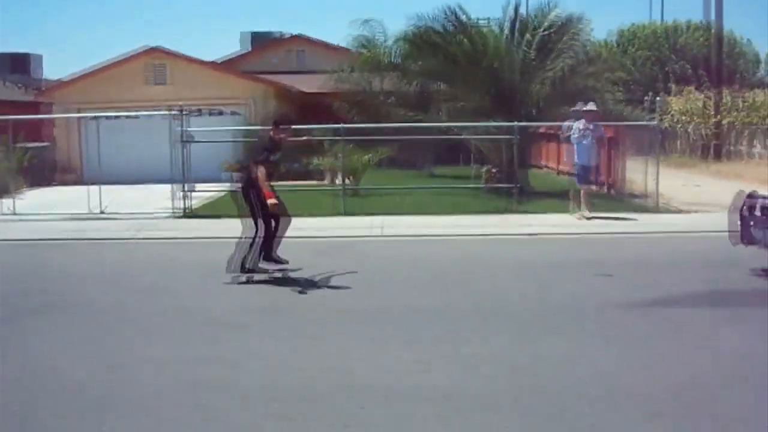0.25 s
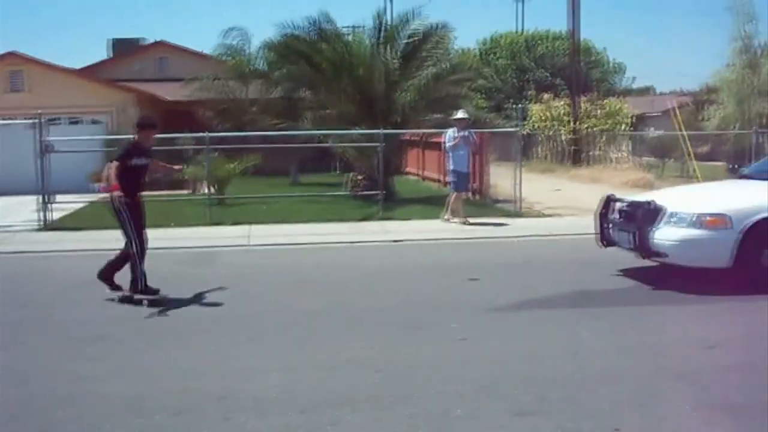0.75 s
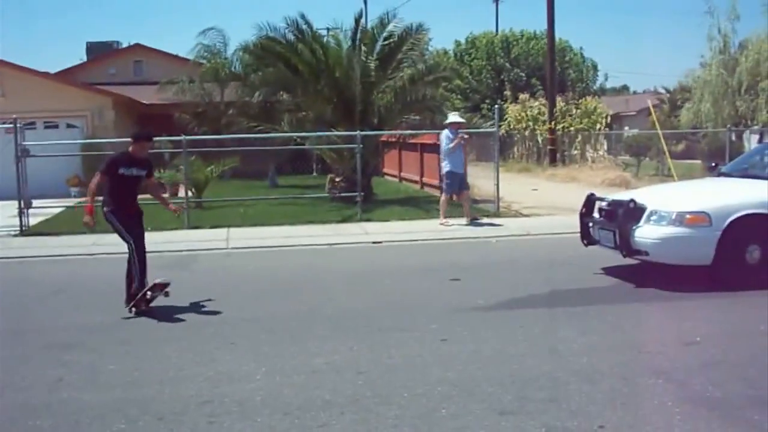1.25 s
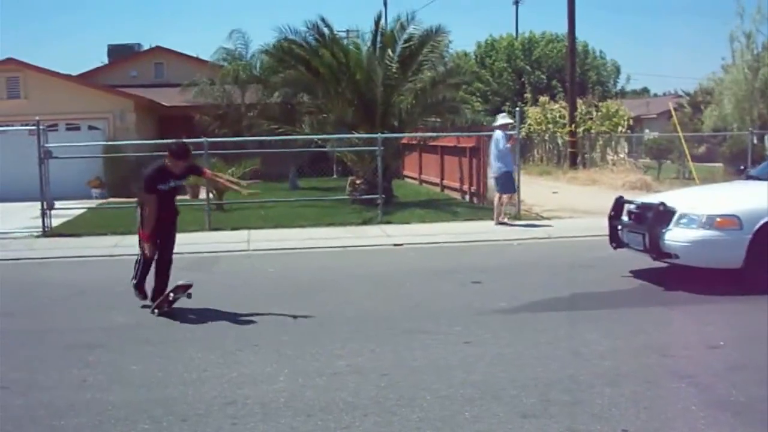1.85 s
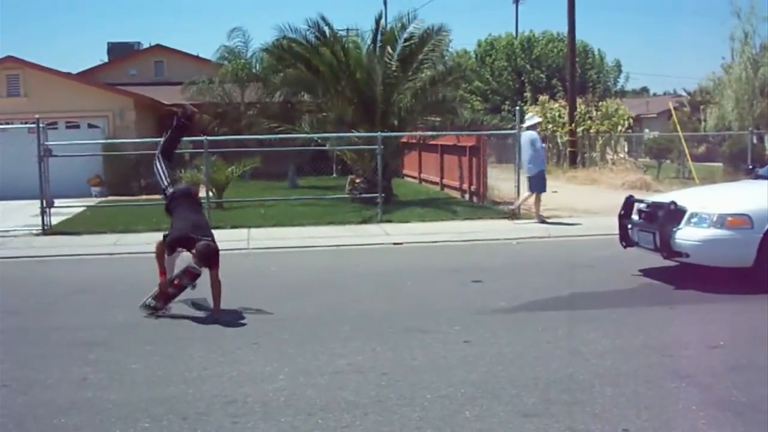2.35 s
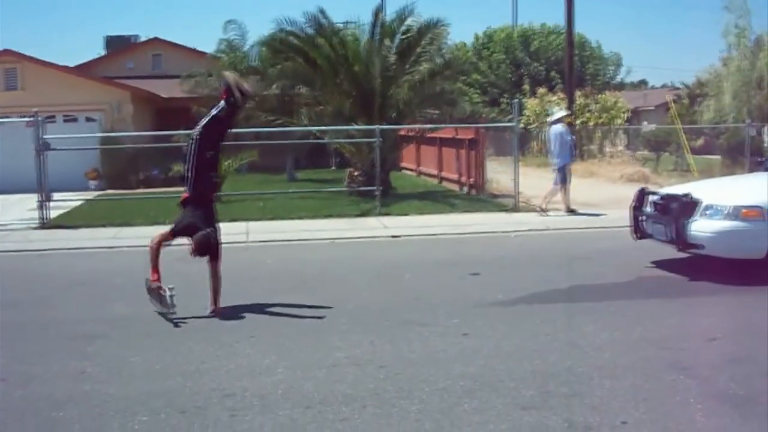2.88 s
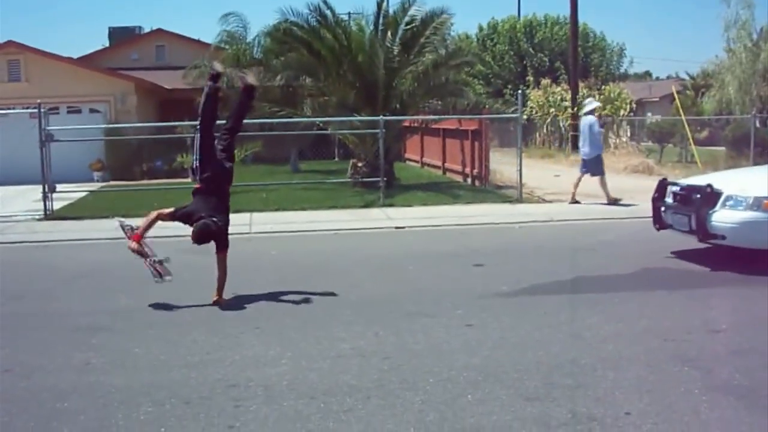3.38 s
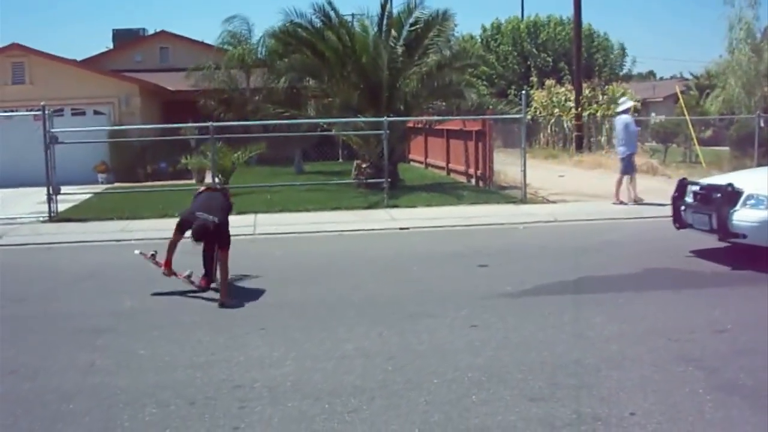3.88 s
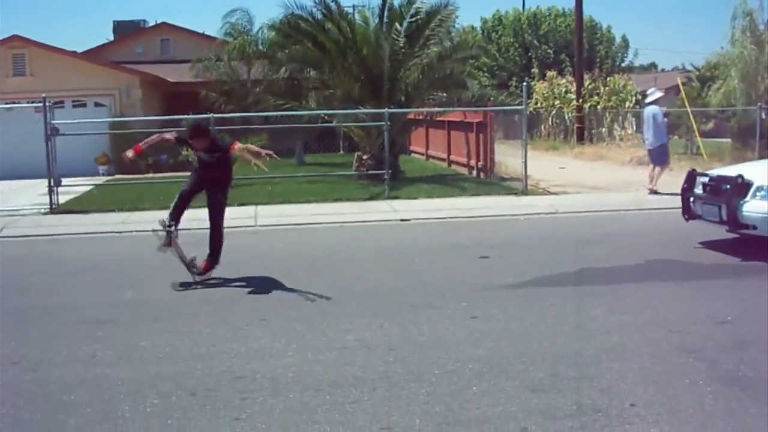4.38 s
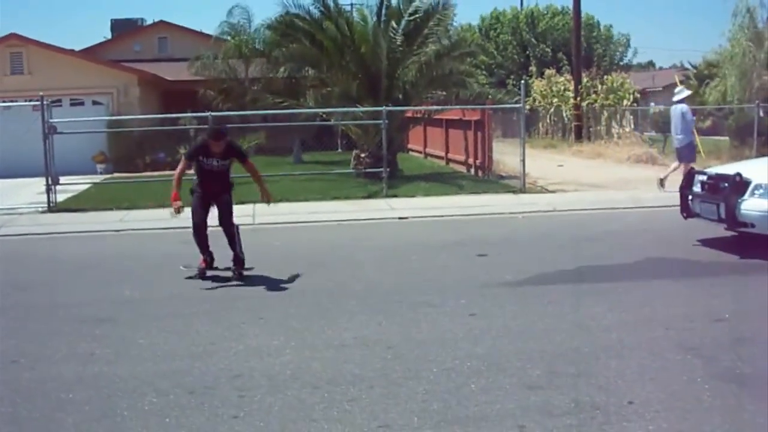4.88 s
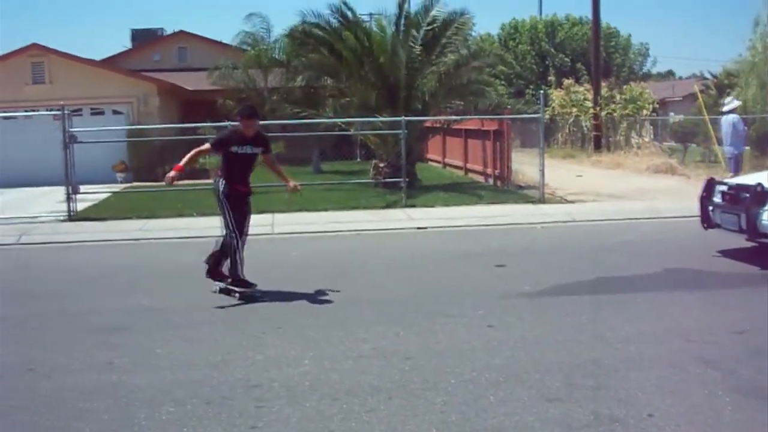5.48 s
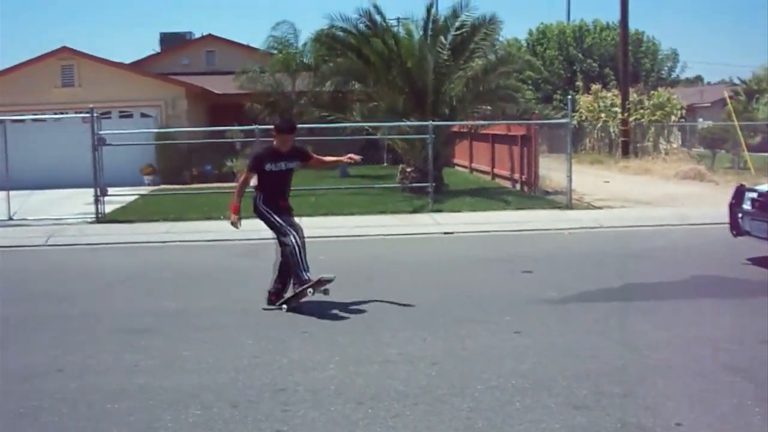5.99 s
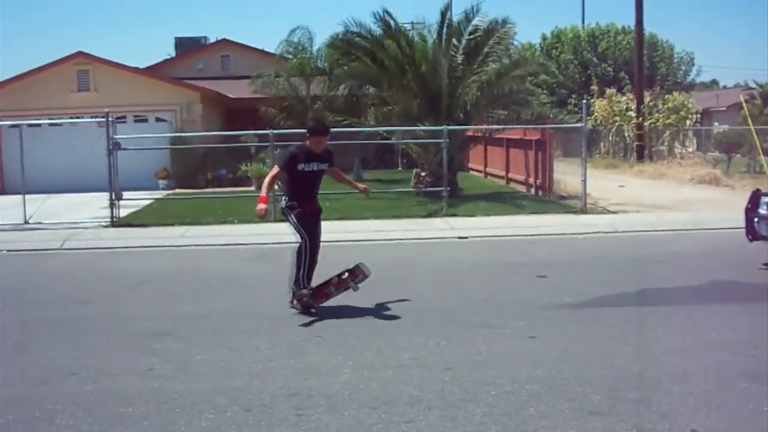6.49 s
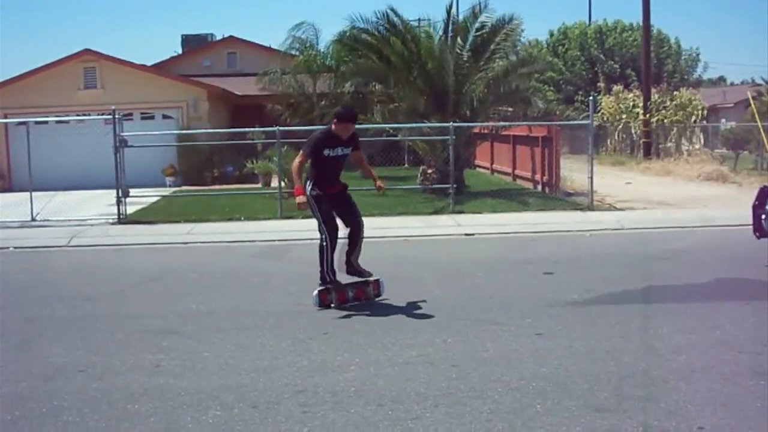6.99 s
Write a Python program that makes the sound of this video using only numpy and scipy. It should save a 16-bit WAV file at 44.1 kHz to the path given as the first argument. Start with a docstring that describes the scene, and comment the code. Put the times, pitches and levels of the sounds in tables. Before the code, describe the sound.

Hard skateboard clacks, light knocks and short gritty drags on a residential street, over rumbling wind buffets and a faint distant town hush.

```python
"""A skateboard's wooden deck on street asphalt, a few metres off: resonances driven by spiky noise.
A faint clack and a scrape, two hard clacks at 0.38 s, sparser knocks and drags, a cluster near 2.7 s,
the hardest burst at 4.9 s, then mostly light clacks and drags until a hollow knock near 6.9 s.
House fronts answer with a short random-phase wash. Throughout, low coloured noise and short thumps
make wind buffet the microphone, over a far town hush of noise with a faint wavering drone."""
import sys
import numpy as np
from scipy import signal
from scipy.fft import rfft, irfft, next_fast_len
from scipy.io import wavfile
from scipy.ndimage import uniform_filter1d, map_coordinates

SR = 44100
rng = np.random.default_rng(int(sys.argv[2]) if len(sys.argv) > 2 else 0)


def log_audio(samples):
    """Write samples as a 16-bit WAV file to the path given in sys.argv[1]."""
    # one column per channel
    frames = np.atleast_2d(samples).T
    # limit to full scale, then quantise
    limited = np.clip(frames, -1, 1)
    pcm = np.round(limited * 32767).astype(np.int16)
    wavfile.write(sys.argv[1], SR, pcm)


N = 319504
T = np.arange(N) / SR


def amp(db):
    """dB to amplitude."""
    return 10 ** (np.asarray(db) / 20)


def unit(x):
    """x scaled to rms 1."""
    return x / np.sqrt(np.mean(x ** 2) + 1e-20)


def along(points, hz):
    """(f/Hz, value) points read on a log frequency axis."""
    f, v = np.transpose(points)
    return np.interp(np.log(hz + 1), np.log(f + 1), v)


def curve(points):
    """(t/s, value) points, one value per sample."""
    s, v = np.transpose(points)
    return np.interp(T, s, v)


def wobble(knots_per_s):
    """Smooth random curve."""
    knots = rng.standard_normal(int(N * knots_per_s / SR) + 4)
    return map_coordinates(knots, [T * knots_per_s])


def filtered(x, response):
    """x times a complex response of frequency."""
    m = next_fast_len(N + SR // 2)
    return irfft(rfft(x, m) * response(np.fft.rfftfreq(m, 1 / SR)), m)[..., :N]


def noise(spectrum):
    """Coloured noise of rms 1."""
    return unit(filtered(rng.standard_normal(N), lambda hz: amp(along(spectrum, hz))))


def resonant(x, modes):
    """x through causal band-pass resonances of alternating sign."""
    def response(f):
        total = 0
        for k, (hz, width_hz, db) in enumerate(modes):
            damping = 1j * f * width_hz
            total = total + (-1) ** k * amp(db) * damping / (hz * hz - f * f + damping)
        return total
    return filtered(x, response)


# deck modes: f/Hz, width/Hz, relative level/dB
DECK_MODES = [(1065, 250, 10.5), (1276, 320, 7.5), (1833, 278, 5.5), (2490, 295, 2.5), (2850, 970, 3.5),
              (3430, 350, 4.5)]


def deck(drives):
    """Bending modes of the wood: row k drives mode k."""
    return sum((-1) ** k * resonant(row, [mode]) for k, (row, mode) in enumerate(zip(drives, DECK_MODES)))


def favour(mode, fall_db):
    """The touched spot decides which mode speaks most; its neighbours fall away."""
    return amp(-fall_db * np.abs(np.arange(len(DECK_MODES)) - mode))[:, None]


# axles and hangers: f/Hz, width/Hz, relative level/dB
TRUCK_MODES = [(3996, 380, 0), (4490, 690, -1.5), (4940, 600, -2.5)]
# hard rim: f/Hz, width/Hz, relative level/dB
RIM_MODES = [(7090, 980, 2.5), (7600, 1040, 2), (8430, 820, -0.5)]
# contacts: t/s, blow level/dB, rattle t60/s, [knock, trucks, rim] level/dB over the blow,
# favoured deck mode (0-5; beyond 5 leans to the top), send to the houses level/dB over direct
CONTACTS = [(0.156, -32, 0.013, -12, 4, -13, 1, 12), (0.3756, -4.5, 0.0053, -20, -16, -4.5, 0.39, -1),
            (.377, -5.5, 0.013, -10.5, -20, -18, 2.78, -0.5), (0.3842, -18, 0.025, -15, -7, -24, 2.7, 9),
            (0.4178, -20, 0.034, -21, -15, -17, 2, 5), (0.4246, -28.5, .015, -2, -16, -17, 3.6, 10),
            (.496, -29.5, 0.039, -8, -18, -28, 2.4, 0), (0.5763, -34.5, 0.027, -3, -12, -5.5, 2.5, 16),
            (.936, -17, 0.021, -9, -10, -11.5, 2.8, 9), (1.2024, -22, 0.01, -20, -10, -10, 1.4, 5),
            (1.2845, -21, 0.033, -8.5, -5.5, -23, 1.4, 6), (1.5648, -37, 0.017, 2, -5, -6, 0.87, 17.5),
            (2.6494, -26, 0.046, 3, -9, -23, 0.1, -0.5), (2.652, -16, 0.017, -31, -7.5, -10.5, 2.4, 3),
            (2.6571, -13.5, 0.009, -22, -25, -30, 2.3, -4), (2.8254, -8, 0.011, -5, -10, -24, 0.98, 5),
            (2.827, -10.5, 0.019, -17, 3, -13.5, 2.3, -7), (2.835, -18.5, 0.024, -12.5, -8, -11.5, 3, 16),
            (3.4867, -25, 0.0098, -4, -9, -11.5, 1.5, 13), (4.0784, -23.5, 0.031, -2.5, -3, -3, 0.82, 10),
            (4.082, -18.5, 0.017, 0.5, -6, -26, 3.1, -4), (4.9088, -2.5, 0.032, -20.5, -9.5, -15.5, 7, -10),
            (4.911, 1.5, 0.0059, -22.5, -16, -15, 2.44, -3), (4.9124, -12, 0.033, -3.5, -12, -17, 6.1, 5.5),
            (4.9184, -19.5, 0.028, -10.5, -8, -10, 2.5, -4), (4.929, -28, 0.043, -1.5, 5, -5.5, 2.6, -6),
            (4.9341, -19, .012, -13, -9, -12, 2, -5), (4.9506, -18, 0.032, -4, -7, -14, 2.2, -6),
            (4.9556, -10.5, 0.0079, -12, -10, -21, 2.23, 8), (4.9581, -13, 0.009, -4.5, -9, -34, 1, -3),
            (5.077, -33, 0.068, -13, -24, -37, .4, 13), (5.732, -25.5, 0.037, -7.5, -2, 1.5, 2.6, -11),
            (5.7855, -17, 0.015, -17, -6, -11, 2.5, 3.5), (5.7947, -33, 0.0091, -3, -8, 2, 4, -2),
            (5.919, -35, 0.043, -13, -10, -16, 1, 12), (5.9679, -29.5, 0.015, -17, -1, -6, 2, 12),
            (6.0202, -32.5, 0.037, -6.5, -6, -7, 1.6, 11), (6.099, -21.5, 0.0053, -8, -26, -24, 2.8, 0),
            (6.2146, -21, 0.026, -8, -22, -25, 0.67, -25), (6.221, -26.5, 0.016, -10, -9, -4, 2.6, -1),
            (6.379, -32, 0.018, -23, -22, -14, 0.9, 2), (6.613, -33, 0.022, -14, -19, -11, 1.5, 14),
            (6.649, -33, 0.041, -9, -8, -5.5, 1.7, 6), (6.873, -32, 0.025, 5, -7, -9, 1.3, 16),
            (6.8972, -15, 0.016, 12.5, 2, -22.5, 3.3, -11.5),
            (6.9083, -20.5, 0.024, -6, -23, -13.5, 0.43, -3), (7.023, -35, 0.016, 1, -21, -34, 1, -3)]
WOOD_DB, KNOCK_DB = 12, 5.5  # how readily the deck turns a blow into crack and into knock
KNOCK_HZ, KNOCK_HZ_PER_DB = 655, -6.5  # the freer the deck, the louder and lower its knock
SNAP_S, SNAP_DB, SNAP_DB_PER_S = 0.0001, 12, -480  # delay, level over the rattle, slope with its t60
THUD_S, THUD_DB = 0.00092, -5
RATTLE_RISE_S = 0.00097


def clacks():
    """Snap and rattle drive deck, trucks and rim; knock and thud add. Returns (direct, to houses) pairs."""
    t = np.arange(SR // 12) / SR
    shape = (len(DECK_MODES) + 2, len(t))
    drive = np.zeros((shape[0], 2, N + SR))
    hollow = np.zeros((2, N + SR))

    f = np.fft.rfftfreq(len(t), 1 / SR)
    parts = [[mode] for mode in DECK_MODES] + [TRUCK_MODES, RIM_MODES]
    heard = np.sqrt([sum(w / np.hypot(2 * (f - hz), w) ** 2 for hz, w, _ in part) for part in parts])
    heard /= np.linalg.norm(heard, axis=1)[:, None]  # band in which each part answers

    for s, db, t60, knock_db, trucks_db, rim_db, mode, away_db in CONTACTS:
        start = round(s * SR)
        span = slice(start, start + len(t))
        paths = amp([[0], [away_db]])

        spikes = rng.standard_normal(shape) * amp(4.4 * np.minimum(rng.exponential(size=len(t)), 4.5))
        fade = amp(db + WOOD_DB - 60 * t / t60) * (1 - np.exp(-t / RATTLE_RISE_S))
        strength = np.linalg.norm(fade)
        rattle = spikes * fade
        # each part's energy is set, its grain is chance
        grit = rattle * strength / np.linalg.norm(rfft(rattle) * heard, axis=1)[:, None]
        grit[:, round(SNAP_S * SR)] += amp(SNAP_DB + SNAP_DB_PER_S * t60) * strength  # first hard touch
        shares = np.vstack([favour(mode, fall_db=7), amp([[trucks_db], [rim_db]])])
        drive[..., span] += (grit * shares)[:, None] * paths

        # the deck stays pressed to the ground: the knock swells and is choked at once
        u = t / (0.11 * t60)
        swell = (u * np.exp(1 - u)) ** 2
        hz = KNOCK_HZ + KNOCK_HZ_PER_DB * knock_db
        hollow[:, span] += paths * amp(db + knock_db + KNOCK_DB) * swell * np.sin(2 * np.pi * hz * t)

        # thud: the whole board pushed against the ground, equal on both paths
        v = t / THUD_S
        hollow[:, span] += amp(db + THUD_DB) * v * (2 - v) * np.exp(-v)

    *wood, trucks, rim = drive[..., :N]
    crack = deck(wood) + resonant(trucks, TRUCK_MODES) + resonant(rim, RIM_MODES)
    return crack, hollow[:, :N]


def grains():
    """Stones of the asphalt ticking past in clumps."""
    clumps_db = 4 * wobble(200) + 1.2 * wobble(60)
    spikes_db = 3.73 * np.minimum(rng.exponential(size=N), 6.5)
    return rng.standard_normal(N) * amp(spikes_db + clumps_db)


# deck bending as a whole when dragged: f/Hz, width/Hz, relative level/dB
BELLY_MODES = [(735, 206, -6.5), (314.5, 35, 1)]
# wood and wheels dragging: t/s of the top, rise/s, fall/s (20 dB each), top level/dB,
# [trucks, rim, belly] level/dB over the wood, favoured deck mode (0-5)
STROKES = [(0.106, 0.002, 0.098, -43.5, -2, -9, 10.5, 1.2), (0.212, 0.22, 0.15, -29, -16, -27, -3.5, 2.3),
           (.47, 0.051, 0.072, -35, -27, -35, -2.5, 1.5), (0.956, 0.02, 0.015, -21.5, -12, -20, -2, 1.1),
           (1.071, 0.056, 0.16, -40.5, -4, -8, 6, 1.5), (1.22, 0.062, 0.061, -26.5, -12, -20, 0, 1.9),
           (2.42, 0.04, 0.1, -40.5, -30, -14, 0, 1.1), (2.547, 0.0086, 0.014, -29.5, -30, -18, -39, 3.05),
           (3.492, 0.0028, 0.025, -27, -9, -12, -5.5, 2.3), (4.089, 0.004, 0.053, -33.5, -5, -7, -0.5, 2),
           (4.44, 0.025, 0.2, -48.5, -7.5, -4, -7, 1.2), (4.661, 0.04, 0.036, -37, -6.5, -17, -11, 2.3),
           (5.06, 0.091, 0.17, -40.5, -18, -36, -17, 1.7), (5.42, 0.13, 0.57, -49, -8, -9, -13, 1.6),
           (5.64, 0.035, 0.042, -45, -9, -23, -24, 1.8), (5.751, 0.024, 0.033, -27.5, -10, -12.5, 0, 1.9),
           (5.97, 0.14, 0.15, -51.5, -7.5, -3, 13.5, 1.2), (6.16, 0.083, 0.061, -35.5, -29, -25, 6, 1.2),
           (6.206, 0.028, 0.038, -32.5, -17, -16, -1, 2.7), (6.81, 0.11, 0.084, -38.5, -22, -12.5, 3, 1.9)]
STROKE_ROUND = 1.11  # 1 pointed, 2 rounded
RIM_FOLLOWS, BELLY_FOLLOWS = 0.63, 0.62  # share of the stroke's dB swing


def scrapes():
    """Wheels and tail ride different stones: each part resonates to partly its own grains."""
    shared = grains()

    def ticks():
        return 0.37 * shared + grains()

    modes = unit(np.array([resonant(ticks(), [mode]) for mode in DECK_MODES]))
    trucks, rim, belly = (unit(resonant(ticks(), part)) for part in (TRUCK_MODES, RIM_MODES, BELLY_MODES))
    out = np.zeros(N)
    for s, rise, fall, db, trucks_db, rim_db, belly_db, mode in STROKES:
        u = np.abs(T - s) / np.where(T < s, rise, fall)
        on = u < 4
        stroke_db = -20 * u[on] ** STROKE_ROUND
        gate = np.exp(-(u[on] / 2) ** 4)  # the wheels leave the ground
        share = favour(mode, fall_db=6)
        wood = (share * modes[:, on]).sum(axis=0) / np.linalg.norm(share)
        drag = amp(stroke_db) * (wood + amp(trucks_db) * trucks[on])
        drag += amp(rim_db + RIM_FOLLOWS * stroke_db) * rim[on]
        drag += amp(belly_db + BELLY_FOLLOWS * stroke_db) * belly[on]
        out[on] += gate * amp(db) * drag
    return out


# decay of the house fronts' answer: f/Hz, t60/s
FRONT_DECAY = [(300, 0.98), (1200, 1), (3000, 0.79), (7000, 0.6), (12000, 0.85)]


def fronts(x):
    """Countless walls scatter sound: power per band swells after a gap, then dies, with random phase."""
    hz, _, z = signal.stft(x, SR, nperseg=256)
    t = np.arange(250) * 128 / SR
    decay = amp(-120 * t / along(FRONT_DECAY, hz)[:, None])  # of power
    answer = (1 - np.exp(-(t / 0.0029) ** 2)) ** 2 * decay
    answer *= 1 + 0.8 * np.exp(-((t - 0.108) / 0.016) ** 2)  # a front facing the street, in a bunch
    answer /= answer.sum(axis=1).mean()

    power = uniform_filter1d(np.abs(z) ** 2, size=7, axis=0)
    power = np.abs(signal.fftconvolve(power, answer, axes=1)[:, :z.shape[1]])
    lumps_db = 2.2 * wobble(70) + 1.5 * wobble(200)
    chance = signal.stft(rng.standard_normal(N) * amp(lumps_db), SR, nperseg=256)[2]
    chance /= np.sqrt(np.mean(np.abs(chance) ** 2))
    return signal.istft(np.sqrt(power) * chance, SR, nperseg=256)[1][:N]


# slow buffeting: t/s, level/dB
BUFFET_LEVEL = [(0.0, -19.5), (0.16, -18), (0.22, -9.5), (0.36, -26.5), (0.48, -17), (1.91, -24.5),
                (2.14, -10), (2.26, -20), (3.34, -27), (3.43, -12), (3.55, -25.5), (3.69, -15),
                (3.99, -23.5), (4.44, -19.5), (4.49, -29), (4.58, -12), (4.64, -23.5), (4.78, -16.5),
                (5.08, -29.5), (5.28, -13), (5.3, -16), (5.57, -13.5), (5.6, -21), (5.87, -14), (6.43, -25),
                (6.61, -41), (6.88, -14), (6.94, -29.5), (7.16, -23.5), (7.24, -15)]
# slow buffeting spectrum: f/Hz, relative level/dB
BUFFET_SPECTRUM = [(8, -14.5), (20, 9.5), (45, 4.5), (70, -3.5), (110, -14), (200, -60)]
# faster flutter: t/s, level/dB
FLUTTER_LEVEL = [(0.0, -25.5), (0.18, -22.5), (0.44, -34.5), (0.48, -26.5), (0.78, -29), (0.89, -17.5),
                 (0.95, -26.5), (1.21, -21), (1.41, -38.5), (1.61, -31), (1.85, -44.5), (2.07, -22),
                 (2.16, -12.5), (2.34, -35.5), (2.72, -29), (2.9, -44), (3.05, -28), (3.1, -48),
                 (3.27, -32.5), (4.32, -31), (4.38, -18), (4.42, -35), (4.9, -27.5), (5.06, -44.5),
                 (5.36, -22), (5.91, -21), (6.59, -37), (6.9, -24), (6.96, -53), (7.16, -23), (7.24, -46)]
# faster flutter spectrum: f/Hz, relative level/dB
FLUTTER_SPECTRUM = [(40, -16), (80, 1.5), (130, -7), (220, -16.5), (400, -35), (800, -61)]
# eddies bursting on the port: t/s of the top, peak level/dB, half width/ms
BURSTS = [(.059, -10.5, 1), (.221, -11, 2.7), (0.875, -6, 1.97), (1.174, -13.5, 1), (1.224, -17, 2.2),
          (1.291, -14.5, 1.45), (1.59, -13.5, 1.96), (1.689, -18, 1.7), (2.0717, -12.5, 1.18),
          (2.097, -16.5, 1.1), (2.107, -16, 1.6), (2.124, -7, 2), (2.143, -13, 0.88), (2.172, -11.5, 1.5),
          (2.193, -10, 1.23), (2.205, -10, 1.4), (2.581, -26, 1.6), (2.698, -15.5, 2.5),
          (2.722, -13.5, 2.7), (2.757, -13, 3.4), (2.78, -23, 1.35), (3.047, -11.5, 3), (3.432, -11.5, 5.5),
          (3.665, -21, 1.28), (3.775, -23, 0.9), (3.819, -15, 1.47), (4.27, -15.5, 1.6), (4.364, -7.5, 2.4),
          (4.503, -15.5, 1.48), (4.565, -18, 3.3), (4.769, -13.5, 1.66), (5.446, -16, 2.3),
          (5.69, -21.5, 0.73), (5.88, -16, 1.18), (7.106, -9.5, 3.3), (7.157, -11, 1.84)]


def wind():
    """Slow buffeting, lumpy faster flutter, single short thumps, each a push between two weaker sucks."""
    slow = amp(curve(BUFFET_LEVEL)) * unit(amp(0.35 * wobble(14)) * noise(BUFFET_SPECTRUM))

    gusty_db = 3.2 * wobble(32) + 1.2 * wobble(9)
    lumps = unit(amp(gusty_db) * noise(FLUTTER_SPECTRUM))
    # pushes are sharper than sucks
    lumps += 0.048 * (lumps ** 2 - uniform_filter1d(lumps ** 2, size=SR // 30))
    fast = amp(curve(FLUTTER_LEVEL)) * lumps

    for s, db, half_width_ms in BURSTS:
        near = np.abs(T - s) < 0.03
        u = (T[near] - s) * 1000 / half_width_ms
        fast[near] += amp(db) * (1 - u * u) * np.exp(-u * u / 2)
    return slow + fast


# far town spectrum: f/Hz, relative level/dB
HUSH_SPECTRUM = [(90, -32), (160, -3.5), (300, -6.5), (440, -18), (680, -9.5), (1050, -17), (1800, -18),
                 (2200, -21), (4000, -27.5), (7000, -35.5), (12300, -40)]
# faint wavering drone: f/Hz, width/Hz, level/dB
DRONE_TONES = [(169.7, 2.8, -47), (356.6, 2.5, -53.5)]
HUSH_DB = -40.0


def town():
    """Far traffic and leaves as slowly breathing noise; the drone is noise in narrow resonances."""
    breathing_db = 0.4 * wobble(2.5) + 0.6 * wobble(12)
    out = amp(HUSH_DB + breathing_db) * noise(HUSH_SPECTRUM)
    for hz, width_hz, db in DRONE_TONES:
        out += amp(db) * unit(resonant(rng.standard_normal(N), [(hz, width_hz, 0)]))
    return out


FRONTS_DB = -14.0


def scene():
    """Board, its answer from the houses, wind and town in one channel."""
    (crack, crack_away), (knock, knock_away) = clacks()
    drag = scrapes()
    far = fronts(crack_away + drag + knock_away)
    board = crack + drag + knock
    return (board + amp(FRONTS_DB) * far + wind() + town())[None]


# microphone response: f/Hz, level/dB
MIC_RESPONSE = [(6000, 0), (7500, -4), (9000, -11), (10500, -19), (12300, -26.5)]
TOP_HZ, CLIP_LEVEL = 12300, 0.88


def record(dry):
    """A dull microphone; the hardest blows clip sharply, tops flattened; then a cut at the band limit."""
    heard = filtered(dry, lambda hz: amp(along(MIC_RESPONSE, hz)))
    clipped = heard / (1 + np.abs(heard / CLIP_LEVEL) ** 8) ** (1 / 8)
    return filtered(clipped, lambda hz: hz < TOP_HZ)


dry = scene()
out = record(dry)
log_audio(out)
```